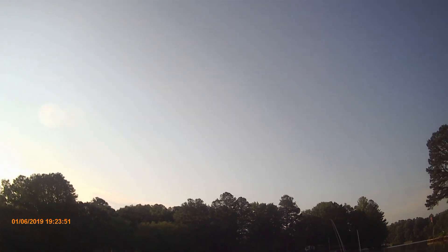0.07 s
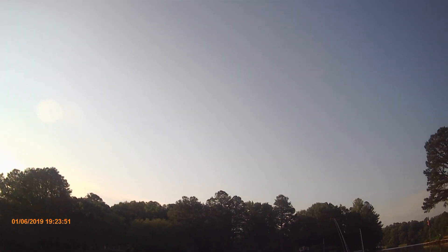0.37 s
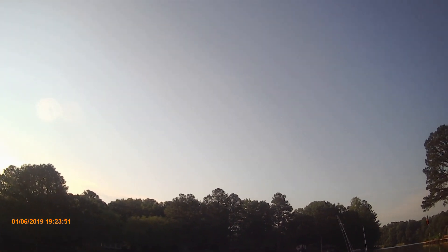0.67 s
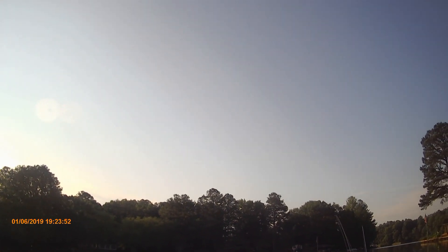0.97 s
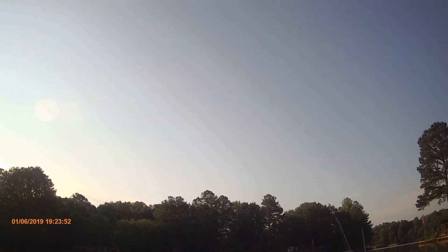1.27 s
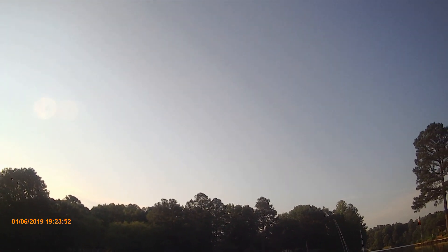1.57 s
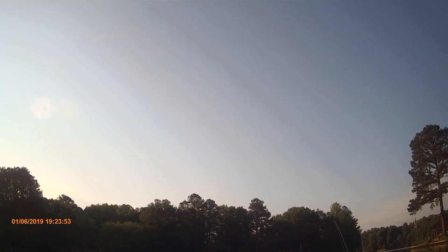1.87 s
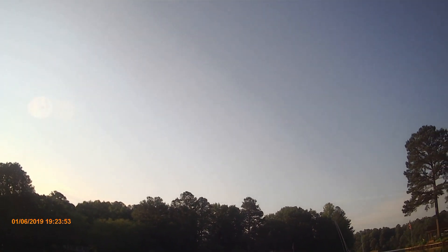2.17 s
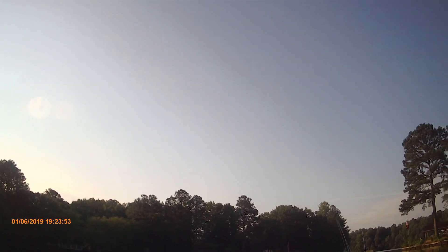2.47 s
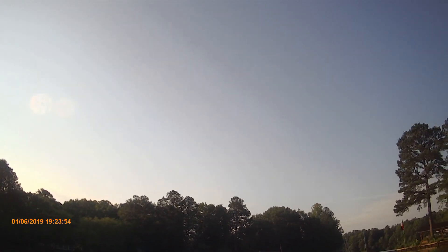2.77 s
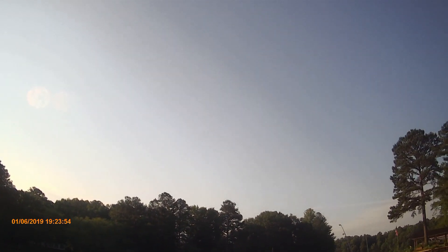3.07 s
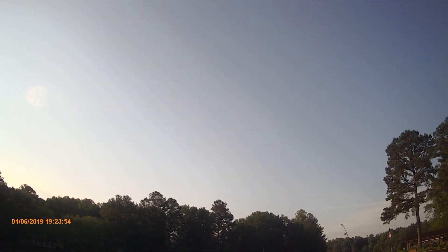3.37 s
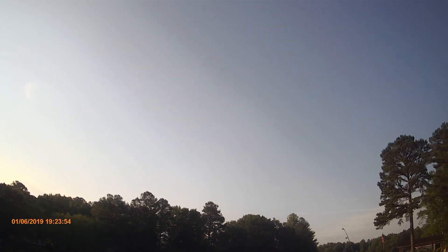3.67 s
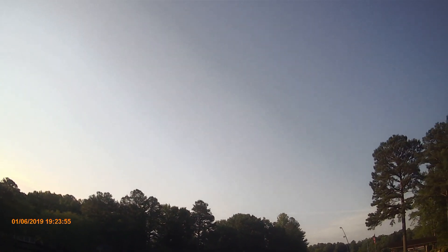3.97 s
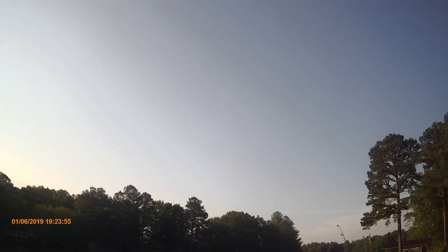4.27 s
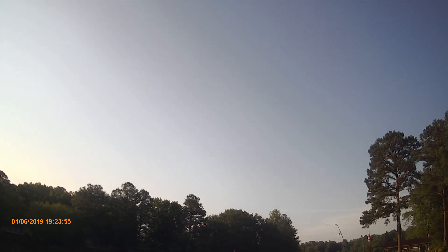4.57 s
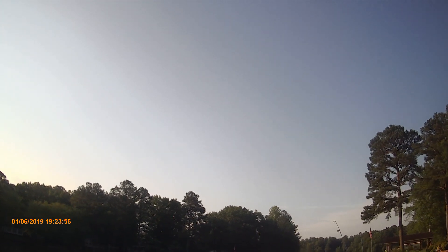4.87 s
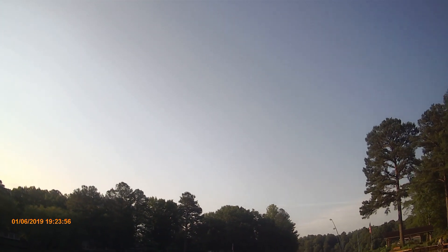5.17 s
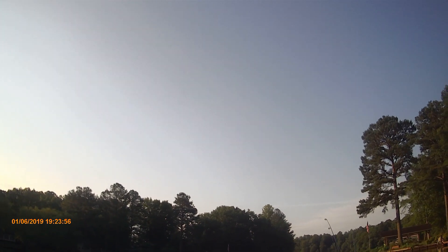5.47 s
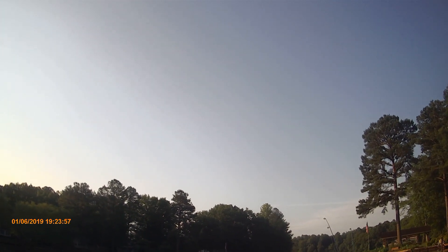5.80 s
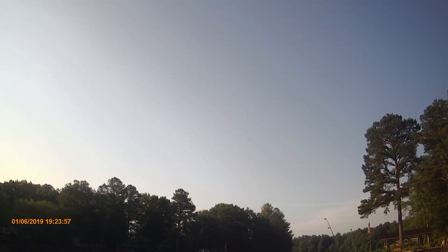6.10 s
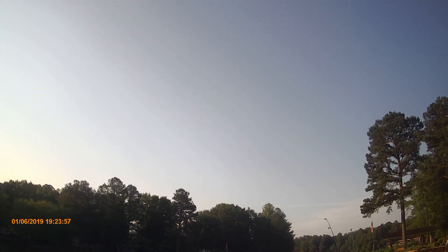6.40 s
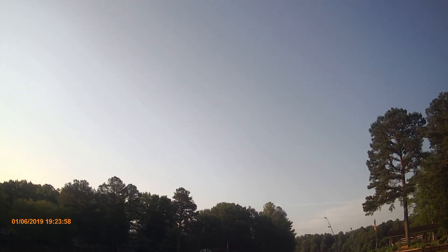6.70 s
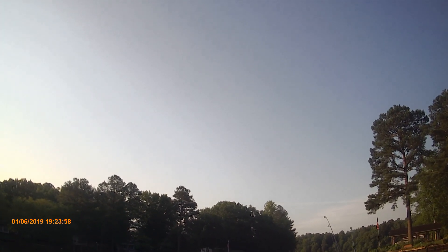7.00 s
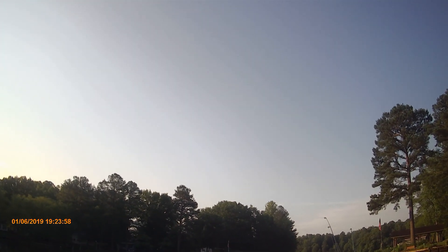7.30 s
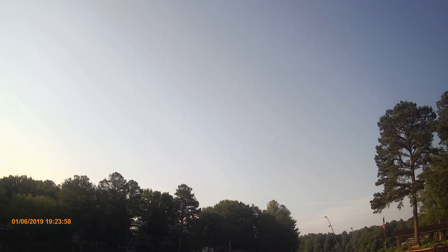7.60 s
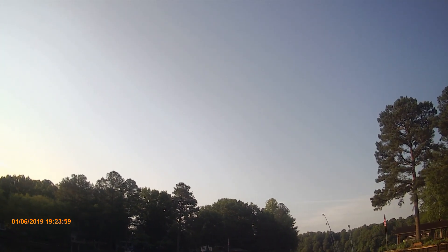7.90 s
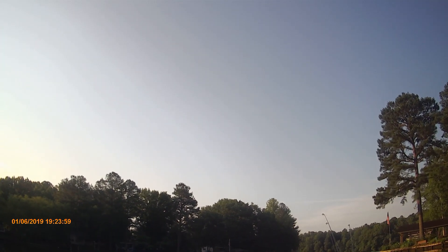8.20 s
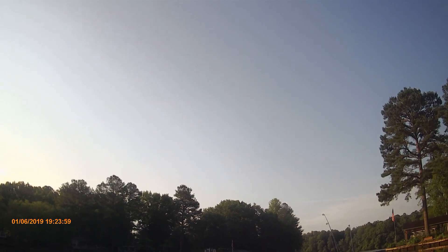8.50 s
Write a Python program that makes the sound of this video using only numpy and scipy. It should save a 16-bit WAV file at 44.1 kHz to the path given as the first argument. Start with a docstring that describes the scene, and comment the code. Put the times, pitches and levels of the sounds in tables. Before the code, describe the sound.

A motor drones outdoors, some way from the microphone, for the whole stretch of nearly nine seconds. It is a low, steady, puttering hum with a soft exhaust rumble and a dull, fluttering rattle. Light knocks stand out of the rattle now and then, at about 0.2, 2.4, 3.7 and 5 seconds. At about 2.5 seconds a far bird gives one very faint, quick rising chip. From around 6 seconds the motor revs up a little, its pitch climbing slowly to the end. It turns slightly rougher, a thin whine sings out from about 6.5 to 8.5 seconds, and the knocks come roughly every half second. One tiny, barely audible tick falls just after 6 seconds. A faint, even hiss lies behind everything.

```python
"""A steady motor drone, outdoors and some way off, that revs up a little after six seconds.
The exhaust hums on the low firing orders and puffs once a firing; the housing rattles dully near 900 Hz,
with a harder knock now and then. A geared shaft adds its own hum, and a whine sings out as speed rises.
Behind it all lie a faint hiss, one chip from a far bird and, later, one tiny tick."""
import sys
import numpy as np
from scipy import signal
from scipy.fft import rfft, irfft, next_fast_len
from scipy.io import wavfile
from scipy.ndimage import map_coordinates

SR = 44100
rng = np.random.default_rng(int(sys.argv[2]) if len(sys.argv) > 2 else 0)


def log_audio(samples):
    """Write samples as a 16-bit WAV file to the path given in sys.argv[1]."""
    # one column per channel
    frames = np.atleast_2d(samples).T
    # limit to full scale, then quantise
    limited = np.clip(frames, -1, 1)
    pcm = np.round(limited * 32767).astype(np.int16)
    wavfile.write(sys.argv[1], SR, pcm)


N = 381465
TIME = np.arange(N) / SR


def amp(db):
    """Decibels to gain."""
    return 10 ** (np.asarray(db) / 20)


def envelope(points):
    """Straight lines through (time, value) breakpoints, one value a sample."""
    return np.interp(TIME, *np.transpose(points))


def wobble(rate):
    """Smooth random modulation, rate knots a second."""
    knots = rng.standard_normal(int(N * rate / SR) + 4)
    return map_coordinates(knots, [TIME * rate])


def filtered(x, response):
    """Apply a gain that depends on frequency."""
    size = next_fast_len(N + SR // 2)
    return irfft(rfft(x, size) * response(np.fft.rfftfreq(size, 1 / SR)), size)[:N]


def coloured(x, eq):
    """Shape x with an EQ curve on a log frequency axis, then normalise to rms 1."""
    points_hz, db = np.transpose(eq)
    shaped = filtered(x, lambda hz: amp(np.interp(np.log(hz + 1), np.log(points_hz), db)))
    return shaped / np.sqrt(np.mean(shaped ** 2) + 1e-20)


def tone(turns, db, waver_db, slip):
    """A partial locked to a rotation; uneven burning shakes its level and phase (slip in radians)."""
    phase = 2 * np.pi * turns + slip * wobble(30)
    waver = wobble(12) + wobble(3.024)
    return amp(db + waver_db * waver) * np.sqrt(2) * np.cos(phase)


def partials(table, turns, throttle, waver_db, slip):
    """A stack of tones whose balance morphs from cruising to revved with the throttle."""
    return sum(tone(order * turns, cruise_db + (revved_db - cruise_db) * throttle, waver_db, slip)
               for order, cruise_db, revved_db in table)


def pulsing_noise(firings, depth, uneven):
    """Noise that swells once a firing, one cylinder stronger than the other."""
    pulse = 1 + depth * np.cos(2 * np.pi * firings) + uneven * np.cos(np.pi * firings)
    return pulse * rng.standard_normal(N)


# EQ of the hiss bed: (frequency [Hz], relative level [dB])
HISS_EQ = [(300, -13.5), (1500, -1.5), (1900, 3), (2250, 3.5), (2750, -3), (3100, -9.5), (3500, -6),
           (4200, -12), (4900, -15.2), (5500, -12), (5850, -14.3), (6400, -14), (8200, -22), (9000, -36),
           (11500, -31.5), (13000, -31.5)]
def hiss(db):
    """A faint, even bed of noise, strongest near 2 kHz."""
    return amp(db) * coloured(rng.standard_normal(N), HISS_EQ)


# the bird's cue: (time [s], dry peak level [dB], start pitch [Hz], end pitch [Hz], length [s])
BIRD_CHIPS = [(2.505, -60.5, 4800, 6400, 0.026)]
def bird():
    """A far bird's chip: one quick, smooth upward sweep of a whistle."""
    out = np.zeros(N)
    for start, db, start_hz, end_hz, length in BIRD_CHIPS:
        progress = np.clip((TIME - start) / length, 0, 1)
        pitch = start_hz + (end_hz - start_hz) * progress
        swell = np.sin(np.pi * progress) ** 2
        out += amp(db) * swell * np.sin(2 * np.pi * np.cumsum(pitch) / SR)
    return out


# EQ of the tick: (frequency [Hz], relative level [dB])
TICK_EQ = [(3500, -30), (5300, 0), (6500, -2), (9000, -30)]
def tick(start_s, db, t60_s):
    """A tiny, bright snap of noise that dies at once."""
    age = TIME - start_s
    decay = (age > 0) * amp(db - 60 * np.abs(age) / t60_s)
    return decay * coloured(rng.standard_normal(N), TICK_EQ)


def among_trees(dry, wet_db, t60_s):
    """Trunks and leaves scatter a short, diffuse tail behind the direct sound."""
    t = np.arange(SR // 2) / SR
    tail = rng.standard_normal(len(t)) * amp(-60 * t / t60_s)
    return dry + amp(wet_db) * signal.fftconvolve(dry, tail / np.linalg.norm(tail))[:N]


# the shaft's partials: (multiple of shaft rate, cruising level [dB], revved level [dB])
SHAFT_PARTIALS = [(1, -60, -57.5), (2, -48, -48)]
def shaft_hum(firings, throttle, gear_ratio):
    """A geared shaft turns faster than the firings, so its hum sits between the exhaust's tones."""
    return partials(SHAFT_PARTIALS, gear_ratio * firings, throttle, waver_db=1.8, slip=0.13)


# fader ride on the whine: (time [s], level [dB])
WHINE_RIDE = [(0, -51), (2.4, -55.5), (3.2, -46.5), (3.6, -51), (6.1, -49), (6.5, -41.5), (6.95, -42),
              (7.35, -39.5), (7.85, -43.5), (8.42, -41.5), (8.56, -51)]
def whine(firings, order):
    """One high order, pitched in the housing's ring, sings out during the rev and then fades."""
    return tone(order * firings, envelope(WHINE_RIDE), waver_db=0.7, slip=0.12)


# knock cues: (time [s], peak level before trim [dB], pitch [Hz])
KNOCK_CUES = [(0.232, -27, 835), (2.373, -24, 921), (3.653, -26, 891), (5.116, -28, 877), (5.628, -27, 880),
              (6.062, -25.5, 931), (6.179, -24, 910), (6.684, -21, 846), (7.128, -21.5, 932),
              (7.594, -24.5, 936.4), (7.995, -28, 767)]
def housing_knocks(trim_db, attack_s):
    """Now and then a harder knock stands out of the rattle and rings the housing for a few cycles."""
    out = np.zeros(N + SR)
    t = np.arange(SR // 16) / SR
    swell = t / attack_s * np.exp(1 - t / attack_s)
    for start, db, hz in KNOCK_CUES:
        out[round(start * SR):][:len(t)] += amp(db + trim_db) * swell * np.sin(2 * np.pi * hz * t)
    return out[:N]


# the housing's resonance: (frequency [Hz], relative level [dB])
HOUSING_EQ = [(200, -39), (550, -11), (700, -10.5), (790, -3), (920, 0), (1000, -3.5), (1100, -11),
              (1300, -21.5), (1600, -31.5), (2500, -57.5), (5000, -84)]
# fader ride on the rattle: (time [s], level [dB])
RATTLE_RIDE = [(0, -36.5), (0.48, -38), (0.58, -34.5), (0.7, -38), (1.25, -36.5), (1.5, -38.3), (1.77, -36),
               (2, -38), (2.6, -38.5), (3.3, -36.5), (3.95, -37.5), (4.12, -41), (4.21, -36), (4.3, -39.5),
               (4.6, -37.5), (5.5, -38), (6.7, -36.5), (7.5, -37.5), (7.9, -38.5), (8.3, -37.5),
               (8.65, -37.5)]
def housing_rattle(firings):
    """Dense knocks of the moving parts blur into a dull, fluttering rattle."""
    db = envelope(RATTLE_RIDE) + 0.68 * wobble(18)
    return amp(db) * coloured(pulsing_noise(firings, depth=0.032, uneven=0.046), HOUSING_EQ)


# low-mid body of the exhaust's turbulence: (frequency [Hz], relative level [dB])
PUFF_EQ = [(20, -32.5), (45, -24.5), (70, -15), (100, -9.5), (125, -9.5), (180, -1.2), (260, -1),
           (340, 0.6), (420, -4), (620, -5.3), (800, -6), (1200, -26), (2500, -58.5)]
# fader ride on the puffs: (time [s], level [dB])
PUFF_RIDE = [(0, -35), (1.5, -36.5), (3.2, -37), (5, -37), (6, -38), (7.2, -37.5), (8.5, -34)]
def exhaust_puffs(firings):
    """Each firing pushes a puff of turbulent gas through the muffler."""
    db = envelope(PUFF_RIDE) + 0.51 * wobble(3)
    return amp(db) * coloured(pulsing_noise(firings, depth=0.14, uneven=0.042), PUFF_EQ)


# the drone's weaker partials: (firing order, cruising level [dB], revved level [dB])
OVERTONE_PARTIALS = [(1.5, -61, -62), (2.5, -51.5, -45.5), (3.5, -51.5, -44.5), (4.5, -62, -57),
                     (5.5, -54.5, -55), (6, -48, -45.5), (6.5, -55, -58), (7, -49, -54.5), (8, -53, -57),
                     (9, -60, -58), (10, -56, -58), (11, -56, -63.5), (12, -54, -61), (14, -58.5, -57.5),
                     (15, -61, -69.5)]
def overtones(firings, throttle, lead_turns):
    """Grit on the drone, rougher under throttle; the half orders come from unequal cylinders."""
    slip = 0.14 + 0.2 * throttle
    return partials(OVERTONE_PARTIALS, firings + lead_turns, throttle, waver_db=1.5, slip=slip)


# where exhaust tones cancel: (firing order, firing rate [Hz], half width [Hz], depth [dB])
EXHAUST_NULLS = [(1, 70.2, 1.3, 9.5), (3, 72.1, 1.2, 15), (4, 74, 0.93, 15)]
def null_dip_db(order, rate):
    """How far an exhaust tone ducks as the speed passes through its null."""
    return sum(depth * np.exp(-((rate - hz) / width) ** 2)
               for null_order, hz, width, depth in EXHAUST_NULLS if null_order == order)


# core of the drone: (firing order, base level [dB], drift [dB/s], gain when revved [dB])
EXHAUST_PARTIALS = [(1, -47.5, -1.12, 7.5), (2, -35.5, 0.586, 3.6), (3, -31, -0.28, 0),
                    (4, -38.5, 0.77, -7)]
# slow swell on the third order, the lead tone while cruising: (time [s], gain [dB])
THIRD_RIDE = [(0, 0), (1.95, 1), (2.15, -1), (3.6, 0.7), (4.05, -2.5), (4.5, 0), (6.6, 0.5), (8.65, 0)]
# the fifth order drifting in and out: (time [s], level [dB])
FIFTH_RIDE = [(0, -37), (.8, -35), (1.5, -37.5), (2.1, -37.5), (2.4, -33.5), (2.75, -36.5), (3.1, -37),
              (3.5, -39), (4.4, -36.5), (4.95, -33), (5.7, -36.3), (6.3, -36), (6.7, -35), (7.3, -37),
              (7.65, -40), (8.65, -38.5)]
def exhaust_hum(firings, rate, throttle, lag_turns):
    """Low orders of the firing pulse; even ones trail odd, so each firing putters strong, then weak."""
    hum = np.zeros(N)
    for order, base_db, drift, revved_gain_db in EXHAUST_PARTIALS:
        db = base_db + drift * TIME + revved_gain_db * throttle - null_dip_db(order, rate)
        if order == 3:
            db += envelope(THIRD_RIDE)
        turns = order * firings - lag_turns * (order % 2 == 0)
        hum += tone(turns, db, waver_db=0.29 * order, slip=0.02 * order)
    fifth = tone(5 * firings, envelope(FIFTH_RIDE), waver_db=1.15, slip=0.078 + 0.12 * throttle)
    return hum + fifth


# a slightly wandering cruise, then the rev: (time [s], firing rate [Hz])
FIRING_RATE = [(0, 68.06), (.75, 68), (2, 68.2), (2.4, 68), (3.4, 68.88), (4, 68.2), (4.9, 68.6),
               (5.25, 68), (5.88, 67.95), (6.17, 69.23), (6.4, 69.13), (6.8, 70.62), (7.05, 71.25),
               (7.3, 71.72), (8.05, 73.06), (8.65, 73.7)]
def motor(cruise_hz, revved_hz):
    """One firing rate drives every tone and noise pulse; the knocks land on their own cues."""
    rate = envelope(FIRING_RATE)
    firings = np.cumsum(rate) / SR
    throttle = np.clip((rate - cruise_hz) / (revved_hz - cruise_hz), 0, 1)
    drone = exhaust_hum(firings, rate, throttle, lag_turns=0.22)
    drone += whine(firings, order=13)
    drone += overtones(firings, throttle, lead_turns=0.06)
    drone += shaft_hum(firings, throttle, gear_ratio=1.445)
    texture = exhaust_puffs(firings) + housing_rattle(firings)
    return drone + texture + housing_knocks(trim_db=-3, attack_s=0.0025)


def scene():
    """Mono mix: the motor leads; bird and tick sit far back among the trees, over the hiss."""
    lead = motor(cruise_hz=68.3, revved_hz=72.3)
    spots = bird() + tick(start_s=6.118, db=-57, t60_s=0.022)
    return (lead + among_trees(spots, wet_db=-7, t60_s=0.35) + hiss(db=-59.5))[None]


def record(dry):
    """Master chain: a 2 ms fade-in and a brick-wall high cut at 12.3 kHz."""
    fade_in = np.minimum(TIME / 0.002, 1)
    return filtered(fade_in * dry[0], lambda hz: hz < 12300)[None]


dry = scene()
out = record(dry)
log_audio(out)
```